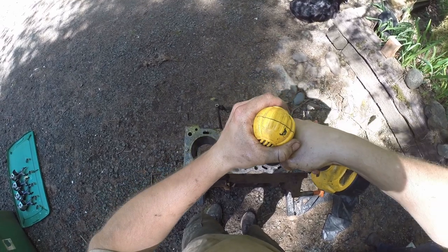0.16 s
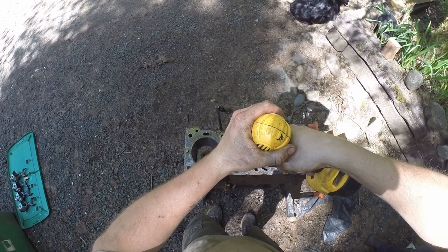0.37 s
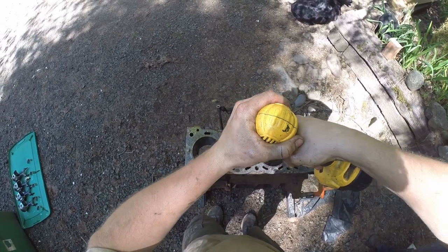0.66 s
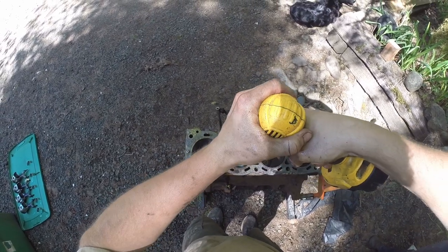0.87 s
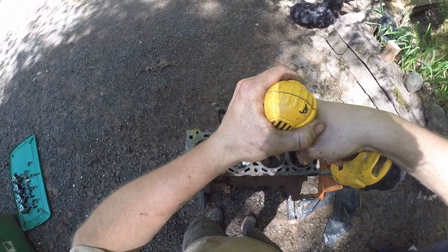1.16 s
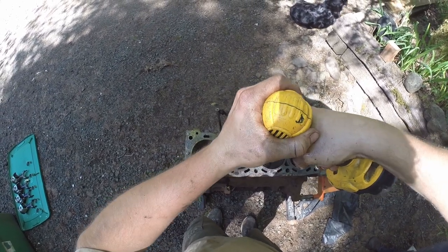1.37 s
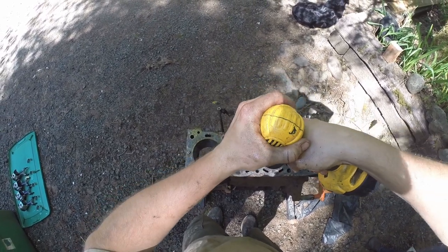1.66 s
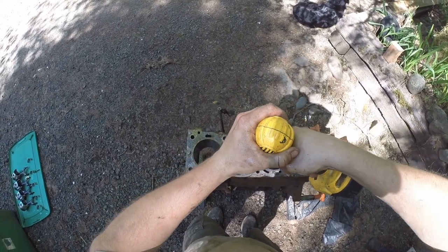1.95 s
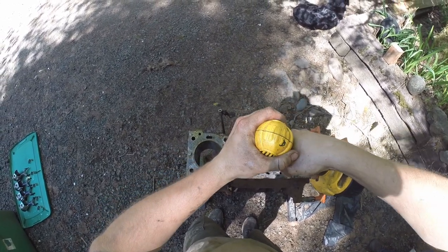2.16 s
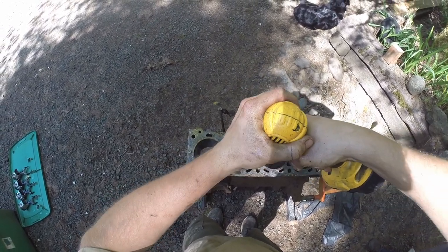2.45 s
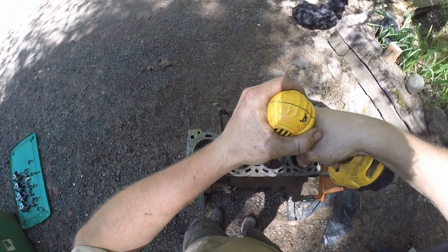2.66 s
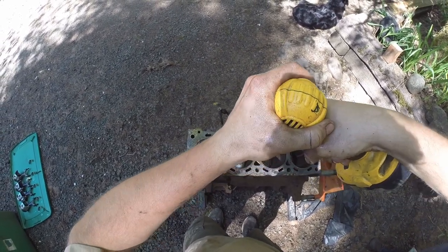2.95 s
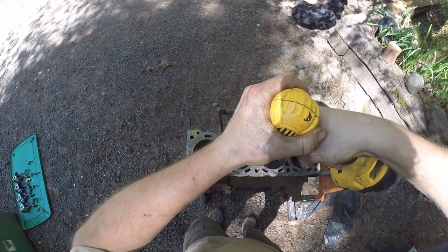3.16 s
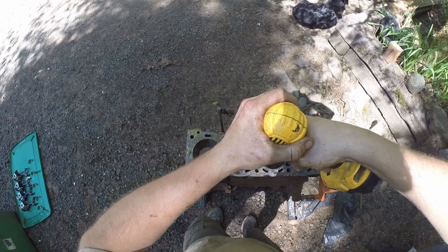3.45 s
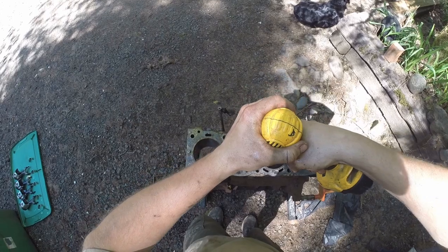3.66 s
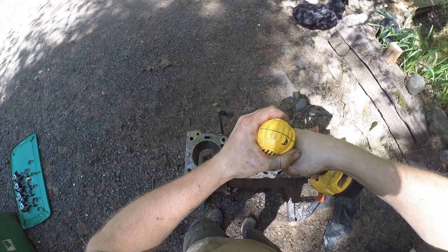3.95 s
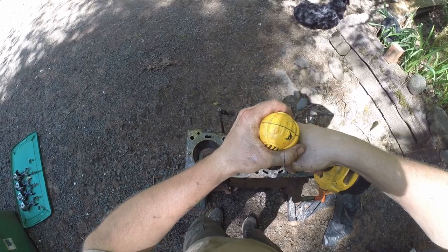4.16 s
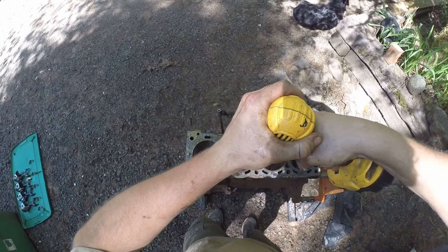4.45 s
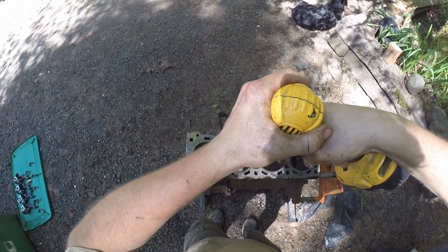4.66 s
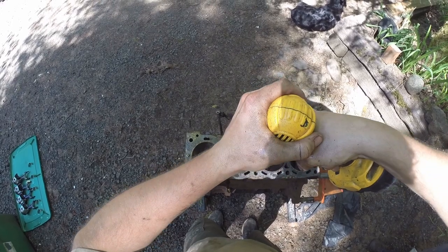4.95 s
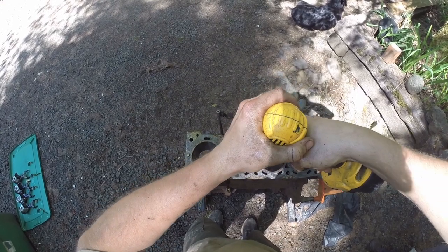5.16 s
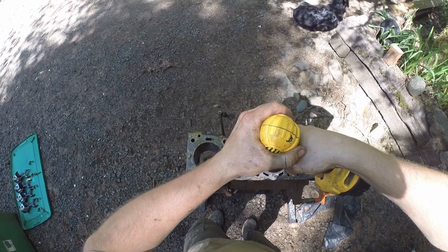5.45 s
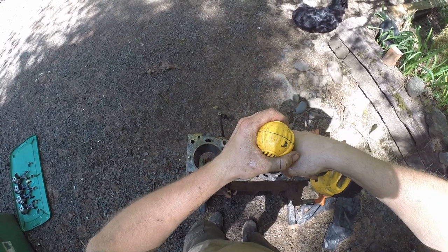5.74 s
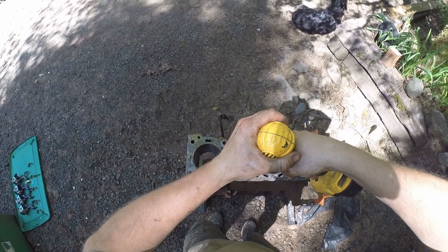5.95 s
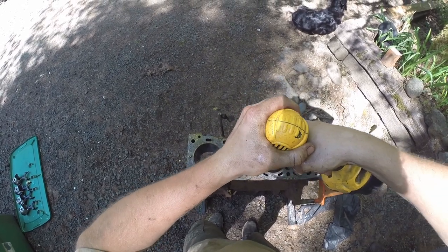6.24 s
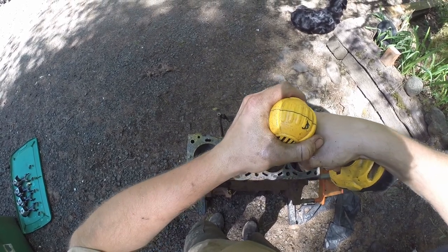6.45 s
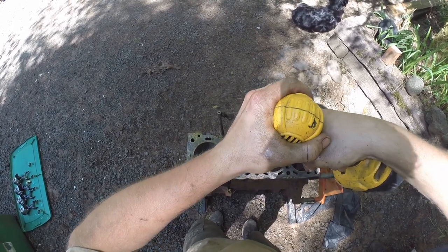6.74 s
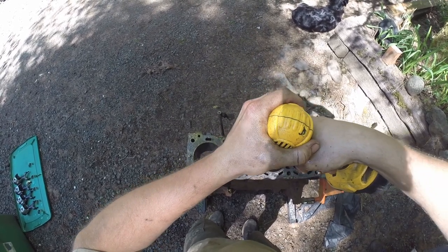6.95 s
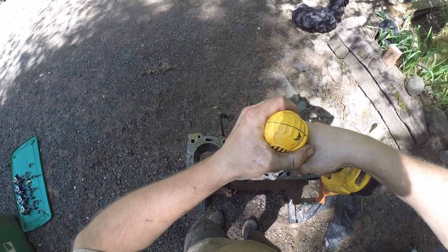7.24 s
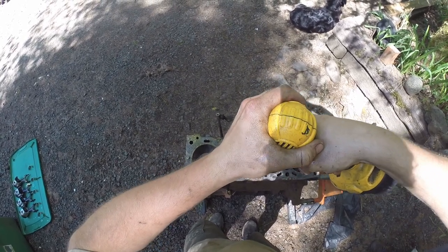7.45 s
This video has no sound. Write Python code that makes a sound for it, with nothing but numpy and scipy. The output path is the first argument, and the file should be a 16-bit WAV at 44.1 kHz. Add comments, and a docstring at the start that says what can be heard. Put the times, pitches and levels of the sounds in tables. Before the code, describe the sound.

Close, dry outdoor sound over a faint low rumble. From 0 s a cordless drill is already whining, with gear rattle, airy vent hiss and the gritty scrape of oiled stones in a metal cylinder; a high squeal is already sounding and fades by 0.3 s. The motor dips near 0.6 s with small squeaks, then races to about 1 s before settling lower by 1.6 s. Short squeals follow, and at 2.1-2.25 s the hone catches in a sharp, crunchy burst of clacks, with a weaker tick at 2.7 s. A strong squeal swells at 3-3.4 s. The motor sags to its lowest near 4.1 s, recovers, and a long squeal fades from 4.9 to 5.6 s. At 6 s it bogs, clacks once, then surges with squeaks around 6.1 s. It slows again through a loud squeal at 6.7-7 s, a brief bright one at 7.15 s, and a weaker ragged one, still grinding at 7.6 s.

```python
"""Outdoors, close by: a cordless drill spins an oiled stone hone in an engine cylinder.
Over a low open-air rumble, the motor's tones follow a speed curve that sags as the stones bind.
Coloured noise makes the gear rattle, vent air and grinding; gliding sines make the squeals and squeaks.
The hone catches in a burst of clacks and two later stray ones: damped tones and crunching noise."""
import sys
import numpy as np
from scipy.fft import rfft, irfft, next_fast_len
from scipy.io import wavfile
from scipy.ndimage import map_coordinates

SR = 44100
rng = np.random.default_rng(int(sys.argv[2]) if len(sys.argv) > 2 else 0)


def digitize_waveform(pressure):
    """Quantize a signal to 16-bit integers and store it at the path in sys.argv[1].

    Rows of a 2-D input are taken as channels; values are limited to [-1, 1].
    """
    field = np.atleast_2d(pressure).T
    bounded = np.clip(field, -1, 1)
    quanta = np.round(bounded * 32767).astype(np.int16)
    wavfile.write(sys.argv[1], SR, quanta)


N = 335601
CRUISE_HZ = 215  # motor turns per second at cruising speed


def amp(db):
    """Decibels to gain."""
    return 10 ** (np.asarray(db) / 20)


def unit(x):
    """Scale to rms 1."""
    return x / np.sqrt(np.mean(x ** 2) + 1e-20)


def curves(rows):
    """One value per sample for each column after the time."""
    seconds, *columns = np.transpose(rows)
    return [np.interp(np.arange(N) / SR, seconds, column) for column in columns]


def wobble(rate, count=N):
    """A smooth random curve of count samples, rate knots a second."""
    knots = rng.standard_normal(int(count * rate / SR) + 4)
    return map_coordinates(knots, [np.arange(count) * rate / SR])


def filtered(x, response):
    """x shaped by a gain that is a function of frequency in Hz."""
    size = next_fast_len(N + 8192)
    return irfft(rfft(x, size) * response(np.fft.rfftfreq(size, 1 / SR)), size)[:N]


def along(points, hz):
    """Gain of (Hz, dB) points, joined on a log frequency axis."""
    f, db = np.transpose(points)
    return amp(np.interp(np.log(hz + 1), np.log(f), db, left=-120, right=-120))


def noise(spectrum):
    """Noise of rms 1 coloured by (Hz, dB) points."""
    return unit(filtered(rng.standard_normal(N), lambda hz: along(spectrum, hz)))


def shaft_noise(orders, turns):
    """Noise laid out along the shaft angle, so that its bands glide with the speed."""
    mean_hz = turns[-1] * SR / N
    band = noise([(order * mean_hz, db) for order, db in orders])
    return map_coordinates(band, [turns / mean_hz * SR])


def tone(cycles, waver_db, slip):
    """A partial of rms about 1 whose strength wavers in dB and whose phase slips in radians."""
    strength = np.sqrt(2) * unit(amp(waver_db * wobble(22)))
    return strength * np.sin(2 * np.pi * cycles + slip * wobble(70))


def speed_level(level, speed):
    """Level in dB of a part that grows steadily with each doubling of speed."""
    cruise_db, doubling_db = level
    return cruise_db + doubling_db * np.log2(speed)


def open_air():
    """Low rumble of the open air, its level drifting gently."""
    # Spectrum of the rumble. Each row: frequency in Hz, relative level in dB.
    rumble_bands = [(15, -7), (30, -2), (48, 3), (75, -3.5), (110, 0), (150, -3), (300, -6), (700, -17),
                    (3000, -47)]
    return amp(-54 + wobble(3.97)) * noise(rumble_bands)


def shaft():
    """Speed relative to cruising, and the count of motor turns; the drag of the stones makes it flutter."""
    # The motor sags as the stones bind and races as they come free.
    # Each row: time in seconds, motor turns per second before the flutter.
    speed_curve = [(0.0, 218.2), (0.36, 229.1), (0.47, 223.6), (0.57, 199.2), (0.68, 243.1), (0.78, 261.1),
                   (0.97, 260.1), (1.57, 222.7), (2.08, 232.1), (2.2, 220.0), (2.52, 224.2), (2.93, 224.6),
                   (3.33, 193.2), (3.64, 203.0), (3.77, 199.2), (4.07, 166.0), (4.26, 198.5), (4.45, 212.1),
                   (4.83, 219.5), (5.17, 210.5), (5.66, 209.0), (5.95, 176.6), (6.0, 182.4), (6.08, 227.5),
                   (6.19, 252.9), (6.42, 241.5), (6.87, 184.9), (7.12, 175.7), (7.48, 206.1), (7.61, 206.7)]
    hz, = curves(speed_curve)
    hz = hz * (1 + 0.00116 * wobble(45))
    return hz / CRUISE_HZ, np.cumsum(hz) / SR


def vents(turns, level_db):
    """Fan air and brush hiss, pulsing once a turn."""
    # Spectrum of the hiss. Each row: frequency in Hz, relative level in dB.
    air_bands = [(3000, -22), (5500, -8.5), (7000, 4), (8500, 2), (9400, -2.5), (10200, -15), (12500, -18),
                 (15000, -23)]
    pulse_db = 0.99 * np.cos(2 * np.pi * turns) + 1.3 * wobble(900)
    return amp(level_db - .5) * unit(noise(air_bands) * amp(pulse_db))


def housing(x):
    """Whatever glides through the housing's fixed resonances swells and fades."""
    # What the drill's housing radiates. Each row: frequency in Hz, gain in dB.
    resonances = [(520, -7.5), (680, 4), (780, -3), (1300, -1.5), (2000, -1), (2500, -18), (2800, 8.5),
                  (3200, 3), (4000, -4), (4350, -12.5), (4650, 3), (5550, -2.5), (5850, 1), (6200, -13),
                  (6500, -5.5), (6800, 0.5), (9200, -1.5), (10500, -11.5), (13000, -20)]
    lowest, highest = resonances[0][0], resonances[-1][0] - 1
    return filtered(x, lambda hz: along(resonances, np.clip(hz, lowest, highest)))


def gearbox(speed, turns, level_db):
    """Teeth rattle and sing, throbbing with the planet gears; the mesh gains less with speed than the rattle."""
    # Spectrum of the rattle. Each row: frequency in Hz, relative level in dB.
    rattle_bands = [(2600, -11), (3300, -7), (4300, -2.5), (4900, 0), (5600, 0), (6300, -8), (9000, -31),
                    (15000, -41)]
    # Rough bands of gear mesh and brushes. Each row: multiple of the motor speed, relative level in dB.
    mesh_bands = [(20, -11), (23, -6), (24.2, -7), (24.7, -3.5), (25.15, -1), (25.6, -18), (27, -25),
                  (40, -35), (46, -20), (51, -14), (55, -27)]
    planet_ratio = .688  # throbs per motor turn
    planet = np.cos(2 * np.pi * planet_ratio * turns)
    rattle_db = 2.5 * planet + 0.76 * np.cos(2 * np.pi * turns) + 2.0 * wobble(300)
    rattle = unit(noise(rattle_bands) * amp(rattle_db))
    mesh_db = 3.2 * planet + 3.3 * wobble(70)
    mesh = unit(housing(shaft_noise(mesh_bands, turns)) * amp(mesh_db))
    return amp(level_db) * (amp(-2.0) * rattle + amp(-6) * mesh / speed ** 0.85)


def body_lift(hz):
    """Decibels that the drill's body adds to a tone at this pitch."""
    # Resonances of the body. Each row: centre in Hz, half width in Hz, lift at the centre in dB.
    body_peaks = [(241, 7.9, 4.5), (445, 20, 6), (1205, 42, 6), (1295, 49, 10)]
    return sum(db / (1 + ((hz - centre) / width) ** 2) for centre, width, db in body_peaks)


def motor(speed, turns):
    """Main tones locked to the shaft, lesser ones through the housing, and buzz that grows steeply with speed."""
    # Main tones of unbalance, magnet poles, armature slots and commutator.
    # Each row: level in dB at cruising speed before the body's lift, dB more per doubling of speed.
    main_levels = [(-58.5, 31.5), (-55.5, 23), (-44, 12.5), (-43, 12)]
    # The multiple of the motor speed for each main tone.
    main_orders = [1, 2, 5, 12]
    # Lesser hum. Each row: multiple of the motor speed, level in dB before the trim and the housing.
    hum_tones = [(3, -49.5), (4, -54.5), (6, -62), (7, -51), (8, -49.5)]
    # Gear whine. Each row: multiple of the motor speed, level in dB before the housing.
    whine_tones = [(12.57, -53), (13.26, -54.5), (14.63, -54.5), (20, -45), (21.5, -50), (21.7, -51),
                   (24, -45.5), (24.9, -46.5), (25.15, -43.5), (29, -55), (30, -47), (31, -49), (34, -58),
                   (36, -54.5), (39, -55), (44, -52), (46, -54), (50, -47.5), (51, -62)]
    # Brush buzz. Each row: multiple of the motor speed, relative level in dB.
    buzz_bands = [(10, -10), (11.7, 3), (12.4, 4.5), (13.5, -1), (15, -3.5), (18, 0)]

    # the rotor and the teeth run true under load and chatter loosely as the motor races
    backlash = 0.22 * speed ** 8
    main = np.zeros(N)
    for order, level in zip(main_orders, main_levels):
        level_db = speed_level(level, speed) + body_lift(order * speed * CRUISE_HZ)
        main += amp(level_db) * tone(order * turns, waver_db=1.63, slip=0.06 * order * backlash)
    hum = sum(amp(db) * tone(order * turns, waver_db=2.5, slip=0.44) for order, db in hum_tones)
    whine = sum(amp(db) * tone(order * turns, waver_db=3.0, slip=0.3 + backlash)
                for order, db in whine_tones)
    buzz = amp(-43) * shaft_noise(buzz_bands, turns) * speed ** 5.5
    return main + housing(amp(-1.4) * hum + whine) + buzz


def clacks():
    """Each catch is a sharp crack and a short crunch with a scraping tail, plus the damped ring of arms and block."""
    # The hone catches. Each row: time in seconds, strength in dB.
    catches = [(2.1206, -16.5), (2.127, -22.5), (2.139, -20), (2.1437, -26), (2.172, -29), (2.179, -27),
               (2.2418, -26), (2.7146, -33), (5.982, -24.5)]
    # Ring of hone arms and iron block. Each row: frequency in Hz, relative level in dB before
    # a random spread, time in seconds to fall 60 dB.
    iron_modes = [(200, -24, 0.17), (437, -13, 0.015), (710, -7.5, 0.092), (1150, -3, 0.059),
                  (1990, -9.5, 0.064), (2650, -8, .04), (4600, -14, 0.11), (4540, -10, 0.086),
                  (5480, 2.5, 0.069), (6040, -28, 0.045)]
    out, t = np.zeros(N + SR), np.arange(SR // 4) / SR
    crunch = noise([(150, -29), (500, -6.5), (2000, -9), (5500, -2), (7000, -10), (10000, -12.5), (15000, -40)])
    # crack, crunch and tail fall 60 dB in 8, 40 and 180 ms
    fade = amp(-4 - 60 * t / .008) + amp(-2 - 60 * t / .04) + amp(-21 - 60 * t / .18)
    for s, db in catches:
        at = round(s * SR)
        ring = np.zeros(len(t))
        for hz, level, t60 in iron_modes:
            decay = amp(level + rng.normal(0, 0.92) - 60 * t / t60)
            ring += decay * np.sin(2 * np.pi * hz * t + rng.uniform(0, 2 * np.pi))
        out[at:at + len(t)] += amp(db) * (amp(-3.5) * ring + fade * crunch[at:at + len(t)])
    return out[:N]


def squeaks():
    """Brief, rough slips that glide in pitch."""
    # Short squeaks as the speed changes.
    # Each row: start in seconds, length in seconds, start pitch in Hz, end pitch in Hz, level in dB.
    slips = [(0.43, 0.03, 3660, 3750, -33), (0.633, 0.05, 4050, 4280, -30.5),
             (0.695, 0.062, 4050, 3890, -26.5), (1.25, .07, 3660, 3540, -36),
             (4.156, 0.062, 3680, 3700, -34), (6.058, 0.05, 4300, 4330, -37),
             (6.117, 0.028, 4150, 3800, -28.5)]
    out = np.zeros(N)
    for s, length, start_hz, end_hz, db in slips:
        size = round(length * SR)
        pitch = np.linspace(start_hz, end_hz, size) + 40 * wobble(190, count=size)
        swell = np.sqrt(2 * np.hanning(size))
        out[round(s * SR):][:size] += amp(db) * swell * np.sin(2 * np.pi * np.cumsum(pitch) / SR)
    return out


def squeals():
    """Stick-slip locks onto the hone's ring and arches up to pitch: ragged while weak, clean once strong."""
    # The stones squeal; a start below zero is already sounding.
    # Each row: start in seconds, length in seconds, pitch at the top of the arch in Hz, mid level in dB,
    # swell from start to end in dB.
    calls = [(-.1, 0.37, 3890, -25.5, -6), (.82, 0.092, 3910, -30.5, 4), (1.143, 0.084, 3830, -30.5, 4),
             (1.735, 0.34, 3845, -29.5, 2), (2.208, 0.066, 3870, -26.5, -8), (2.281, .29, 3806, -30.5, -3),
             (2.6, 0.33, 3795, -32.5, -4), (2.998, 0.37, 3952, -23.5, 4.5), (3.432, 0.31, 3785, -33.5, 0),
             (3.96, 0.093, 3860, -32.5, 0), (4.23, 0.17, 3790, -32.5, 5), (4.563, 0.16, 3770, -32, 4),
             (4.86, .77, 3850, -30, -6.5), (6.18, .21, 3850, -34, 7), (6.685, .31, 3913, -26, 2),
             (6.97, 0.16, 3880, -31.5, 1), (7.135, 0.042, 3950, -23.5, 4), (7.22, 0.32, 3834, -33, 3)]
    grip_s, release_s = 0.034, 0.047  # time for the stick-slip to lock on and to let go
    ragged_below_db = -32.5  # weaker squeals break up
    # how far flat a squeal starts and ends, and how fast it settles
    scoop_hz, droop_hz, settle_s = 139.7, 95, .04
    out, now = np.zeros(N), np.arange(N) / SR
    for start, length, top_hz, level_db, swell_db in calls:
        on = (now > start) & (now < start + length)
        since, left = now[on] - start, start + length - now[on]
        grip = np.sqrt(np.minimum(since / grip_s, 1) * np.minimum(left / release_s, 1))
        db = level_db + swell_db * (since / length - .5)
        ragged = 1 / (1 + amp(2.6 * (db - ragged_below_db)))  # 0 clean, 1 broken up
        flat_hz = scoop_hz * np.exp(-since / settle_s) + droop_hz * np.exp(-left / settle_s)
        pitch = top_hz - flat_hz + (5 + 26 * ragged) * wobble(169.4, count=on.sum())
        flutter_db = (0.7 + 1.6 * ragged) * wobble(40, count=on.sum())
        wave = np.sqrt(2) * np.sin(2 * np.pi * np.cumsum(pitch) / SR)
        out[on] += grip * amp(db + flutter_db) * wave
    return out


def stones(level_db):
    """Oiled stones scrape the bore; their grit bites unevenly and keeps the hone ringing."""
    # Spectrum of the scrape. Each row: frequency in Hz, relative level in dB.
    scrape_bands = [(150, -25), (320, -13), (480, -5), (800, -2.5), (1000, -0.5), (1350, 3), (1700, -2),
                    (2100, -0.5), (2500, -4), (3200, 0), (4400, -5), (6000, -12), (10000, -14),
                    (15000, -33.5)]
    # Spectrum of the hone's ring. Each row: frequency in Hz, relative level in dB.
    ring_bands = [(3200, -17), (3580, -4.5), (3730, 2.5), (3830, -2.5), (4050, -1), (4500, -29)]
    scrape = unit(noise(scrape_bands) * amp(1.44 * wobble(250) + 0.99 * wobble(17)))
    ring = unit(noise(ring_bands) * amp(1.86 * wobble(45)))
    return amp(level_db) * (amp(6.5) * scrape + amp(4.5) * ring)


def scene():
    """Drill, hone and the low rumble of the open air; the motor's speed drives the steady levels."""
    # Slow drift. Each row: time in seconds, change of the drill's rattle and air in dB, of the grinding in dB.
    drift = [(0, .8, -0.9), (.55, 0.9, -1.2), (1.0, 0.7, 0), (1.5, 1.9, -0.3), (2.5, 0, -0.2),
             (3.7, -.3, -0.4), (4.8, -0.5, 0.2), (5.6, -.8, -.9), (6.3, -1.7, .5), (6.9, 1, 1.8),
             (7.61, -.5, 0.8)]
    # Each noise grows with the speed. Each holds: level in dB at cruising speed before drift and
    # the layers' own trims, dB more per doubling of speed.
    air_level = (-38, 9.4)
    gear_level = (-33.5, 7)
    grind_level = (-40, 4.3)
    speed, turns = shaft()
    drill_db, grind_db = curves(drift)
    air = vents(turns, speed_level(air_level, speed) + drill_db)
    gears = gearbox(speed, turns, speed_level(gear_level, speed) + drill_db)
    grinding = stones(speed_level(grind_level, speed) + grind_db)
    hone = clacks() + squeaks() + squeals() + grinding
    return (open_air() + air + gears + motor(speed, turns) + hone)[None]


def record(dry):
    """The treble dips briefly a few times; nothing is kept above the band limit."""
    # Each row: centre of the dip in seconds, length in seconds, depth in dB.
    treble_dips = [(1.072, .032, 16), (1.412, .034, 16), (1.474, .03, 14), (1.836, .032, 17)]
    top_hz = 15250
    t = np.arange(N) / SR
    dip_db = sum(depth * np.exp(-np.square(np.square(2 * (t - s) / length)))
                 for s, length, depth in treble_dips)
    treble = filtered(dry[0], lambda hz: np.interp(hz, [5600, 9500], [0, 1]))
    dipped = dry[0] + treble * (amp(-dip_db) - 1)
    return filtered(dipped, lambda hz: hz < top_hz)[None]


dry = scene()
out = record(dry)
digitize_waveform(out)
```